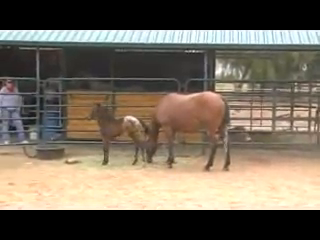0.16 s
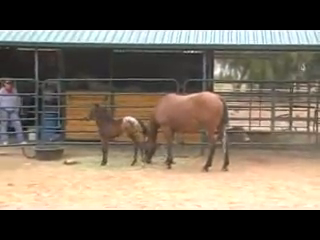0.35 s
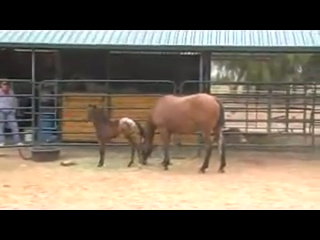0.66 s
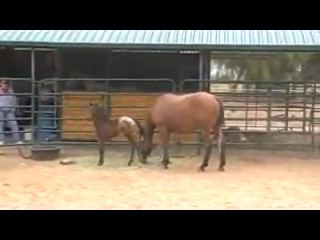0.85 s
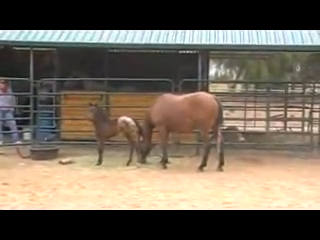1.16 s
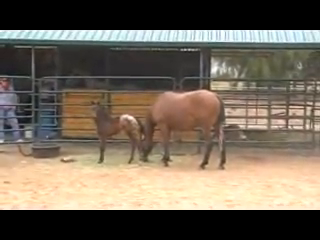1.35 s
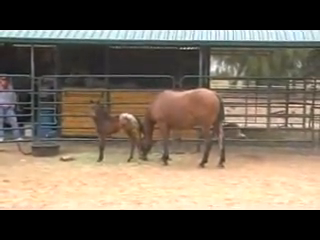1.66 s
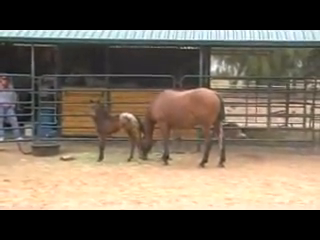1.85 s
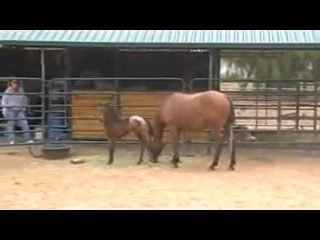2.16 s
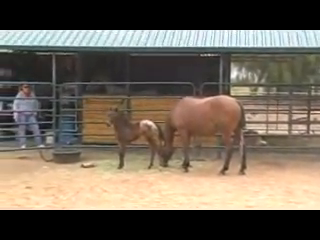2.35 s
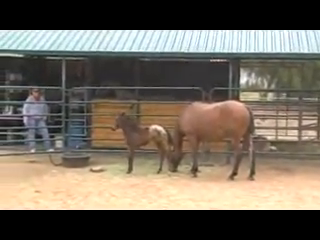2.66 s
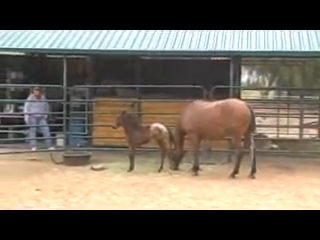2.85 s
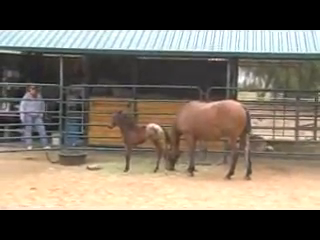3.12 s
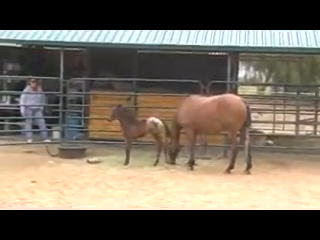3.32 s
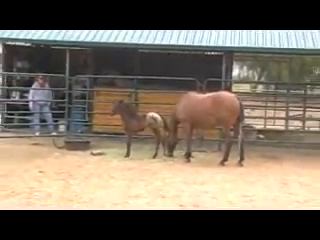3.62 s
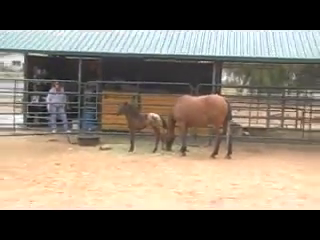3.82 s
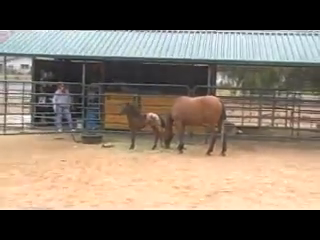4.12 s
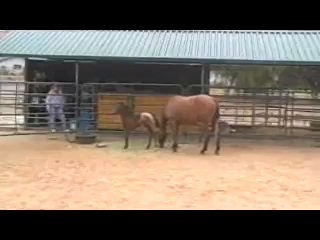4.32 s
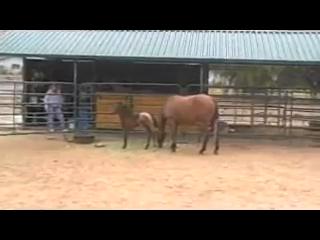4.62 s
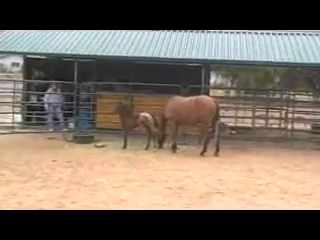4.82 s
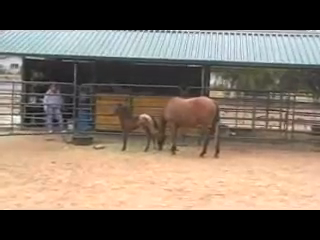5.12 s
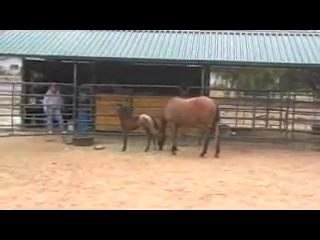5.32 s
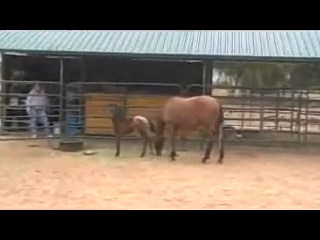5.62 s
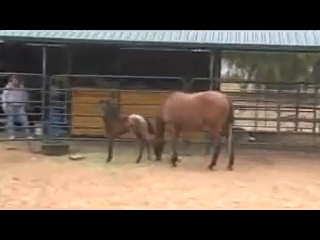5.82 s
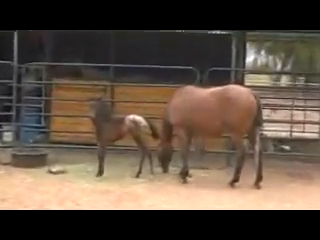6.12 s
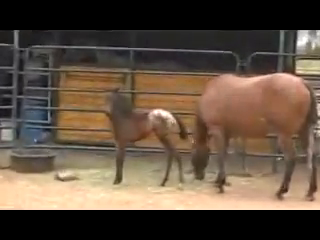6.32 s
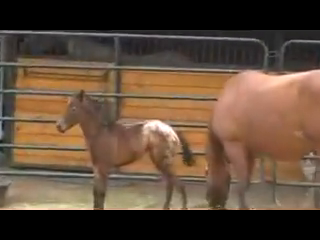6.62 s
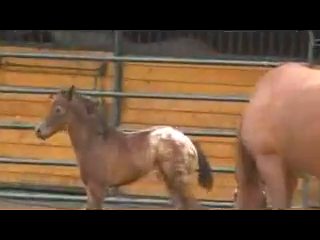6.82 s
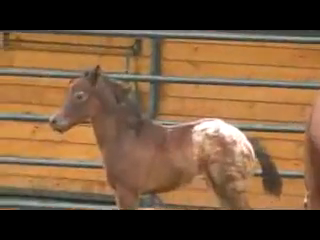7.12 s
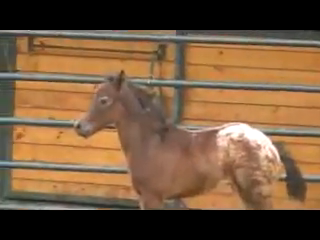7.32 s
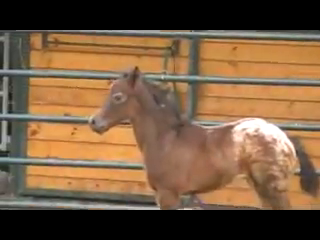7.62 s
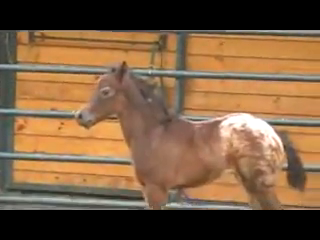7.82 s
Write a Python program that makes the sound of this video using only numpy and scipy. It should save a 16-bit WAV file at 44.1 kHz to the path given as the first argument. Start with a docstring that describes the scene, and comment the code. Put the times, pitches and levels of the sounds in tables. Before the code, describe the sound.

Sparrows chirp for the whole eight seconds under an open shed roof, their short, high, raspy calls trailed by a light echo. One nearer bird, slightly to the right, gives a clear chirrup at about 1, 2.5, 4.3, 6.1 and 7.4 seconds, while others cheep more softly between. A horse's hooves knock dully on boards and scuff loose earth through the first 1.7 seconds, again around 4 to 4.4 and 5.4, and lightly near 6 and 7. Fingers make dry, sharp clicks on a plastic casing right beside the microphone, light from about 2 seconds, firmer at 3.5, then in loud clusters from 4.3 to 5.3 and at 7 seconds. These clicks stand out above the birds. Behind everything a faint, distant low hum holds steady, while a soft rustle and hiss swell and fade together.

```python
"""Sparrows in a paddock shed

Sparrows chirp under the roof of an open shed, their raspy whistles smeared by its echo.
Hooves knock on boards and loose earth; fingers click on a plastic casing next to the microphone.
Behind them lies a far hum, and a faint rustle and hiss swell and fade together."""
import sys
import numpy as np
from scipy import signal
from scipy.io import wavfile

SR = 44100
rng = np.random.default_rng(int(sys.argv[2]) if len(sys.argv) > 2 else 0)


def unload_wav(signal):
    """Save mono or channel-first audio to the path in sys.argv[1] as 16-bit WAV at rate SR, clipped to [-1, 1]."""
    wavfile.write(
        sys.argv[1],
        SR,
        np.round(np.clip(np.atleast_2d(signal).T, -1, 1) * 32767).astype(np.int16),
    )


N = 351477


def whistle(out, start_s, shape, call_db, pitch, rasp_db):
    """Add one call: a near sine with a faint octave and air hissing past the beak. Flutter gives rasp."""
    knots_s, hz, shape_db = np.transpose(shape)
    t = np.arange(int(knots_s[-1] * SR)) / SR
    jitter = rng.uniform(-1.7, 1.7, (2, 100))
    pitch_flutter, level_flutter = [np.interp(t, np.arange(100) * .0016, v) for v in jitter]
    glide_hz = pitch * np.interp(t, knots_s, hz) * (1 + .004 * rasp_db * pitch_flutter)
    phase = 2 * np.pi * np.cumsum(glide_hz) / SR
    fade = np.clip(np.minimum(t, t[-1] - t) / .004, 0, 1)
    level = from_db(call_db + np.interp(t, knots_s, shape_db) + rasp_db * level_flutter) * fade
    breath = filtered(rng.standard_normal(len(t)), (3000, 8500), "band")
    voice = np.sin(phase) + from_db(-29) * np.sin(2 * phase) + from_db(-17) * breath
    i = int(start_s * SR)
    out[i:i + len(t)] += (level * voice)[:N - i]


# Contours of a chirrup's layers: t/s, f/Hz, level/dB
SCRATCHY_RISE = [(0, 4150, -14), (.018, 4750, -5), (.028, 6900, -12)]
CLEAR_BODY = [(0, 2700, -16), (.006, 3750, -11), (.013, 4230, -7), (.027, 4180, -6), (.034, 3250, -9),
              (.046, 4100, -13), (.052, 3300, -18), (.056, 2900, -7), (.066, 2970, -2), (.078, 3250, -4),
              (.085, 3750, -10), (.09, 3100, -20), (.096, 2900, 0.5), (.102, 2800, -4), (.108, 2250, -20)]
SCRATCHY_MIDDLE = [(0, 3600, -6), (.012, 4400, 0), (.03, 3900, -3), (.05, 4300, -10)]
HOARSE_TAIL = [(0, 2700, -3), (.008, 2100, -4), (.022, 3400, -4), (.045, 2800, -5), (.08, 3300, -13)]
# Chirrup cues: t/s, level/dB
CHIRRUP_CUES = [(.980, -26.5), (2.516, -26), (4.289, -26.5), (6.133, -25.5), (7.358, -24)]


def near_sparrow():
    """The lead bird holds its pitch: a scratchy pickup, a clear chirrup, a hoarse dying warble."""
    out = np.zeros(N)
    for s, db in CHIRRUP_CUES:
        pitch = rng.normal(1, .006)
        whistle(out, s - .019, SCRATCHY_RISE, db - 19, pitch, rasp_db=8)
        whistle(out, s - .019, SCRATCHY_RISE, db - 24, pitch / 2, rasp_db=8)   # sub-octave
        whistle(out, s + .104, HOARSE_TAIL, db - 17, pitch, rasp_db=11)
        whistle(out, s + .034, SCRATCHY_MIDDLE, db - 17, pitch, rasp_db=11)
        whistle(out, s, CLEAR_BODY, db, pitch, rasp_db=3.6)
    return out


# Call contours: t/s, f/Hz, level/dB
CHEEP_SHAPE = [(0, 3590, -16), (.008, 4090, -4), (.018, 4400, -2), (.026, 4700, 0), (.032, 3800, -5),
               (.045, 3450, -7), (.065, 3150, -9), (.095, 2750, -15)]
SLUR_SHAPE = [(0, 4200, -12), (.008, 4400, -4), (.022, 4250, -1), (.042, 3600, 0), (.055, 3100, -5),
              (.075, 2800, -10)]
FLICK_SHAPE = [(0, 3100, -14), (.015, 3900, -8), (.023, 4600, 0), (.035, 5500, -7), (.046, 4300, -1),
               (.064, 3000, -2), (.078, 4100, -6), (.086, 4200, -14)]
SCOLD_SHAPE = [(0, 4700, 0), (.012, 4750, 0), (.03, 4500, -3), (.05, 4300, -12)]
# Cues of the steady cheeper: t/s, level/dB
CHEEP_CUES = [(0.167, -37), (1.345, -38), (2.152, -36), (3.052, -39.5), (4.141, -37.5), (5.091, -35.5),
              (5.817, -35.5), (6.474, -38.5), (7.058, -41.5)]
# Cues of the other callers: t/s, level/dB, pitch/ratio
SLUR_CUES = [(0.117, -47, 1.05), (1.255, -46.5, 1.13), (1.955, -45, 1.04), (3.336, -48, 1.11),
             (4.631, -44, 1), (5.328, -45.5, 1.07), (6.537, -42, 0.98)]
FLICK_CUES = [(0.694, -48, 1), (7.674, -43.5, 1)]
SCOLD_CUES = [(2.688, -49, 1), (4.79, -53, 1), (5.93, -56, .95)]
# Short gliding peeps: t/s, start f/Hz, end f/Hz, level/dB
PEEP_CUES = [(0.262, 4670, 4530, -50), (1.28, 2586, 3320, -48), (1.589, 4190, 3500, -55.5),
             (1.625, 2880, 3330, -62), (3.29, 3980, 3600, -54), (4.021, 4530, 3500, -45.5),
             (2.397, 3880, 3500, -54.5), (2.715, 2900, 3150, -47.5), (2.751, 3360, 3750, -46),
             (2.77, 3100, 2780, -53), (3.603, 2990, 3370, -61), (4.83, 3150, 2910, -47.5),
             (4.865, 3550, 3250, -46), (4.867, 3950, 4050, -47), (4.91, 3000, 3620, -50),
             (5.393, 3400, 3230, -54), (7.157, 4590, 4480, -54), (7.765, 3100, 3200, -63),
             (7.91, 5080, 4470, -46)]


def far_sparrows():
    """Birds deeper under the roof whistle cheeps, slurs, flicks, two-voiced scolds and peeps."""
    out = np.zeros(N)
    for s, db in CHEEP_CUES:
        whistle(out, s, CHEEP_SHAPE, db, pitch=rng.normal(1, .006), rasp_db=4.3)
    for s, db, pitch in SLUR_CUES:
        whistle(out, s, SLUR_SHAPE, db, pitch, rasp_db=5)
    for s, db, pitch in FLICK_CUES:
        whistle(out, s, FLICK_SHAPE, db, pitch, rasp_db=4.5)
    for s, db, pitch in SCOLD_CUES:
        whistle(out, s, SCOLD_SHAPE, db, pitch, rasp_db=8)
        whistle(out, s, SCOLD_SHAPE, db - 2, pitch * 1.14, rasp_db=8)
    for s, start_hz, end_hz, db in PEEP_CUES:
        glide = [(0, start_hz, -6), (.02, (start_hz + end_hz) / 2, 0), (.04, end_hz, -6)]
        whistle(out, s, glide, db, pitch=1, rasp_db=5)
    return out


# Finger clicks: t/s, level/dB, hardness/(dB per octave)
CLICK_CUES = [(1.93, -42.5, 1.5), (2.835, -39, -6), (2.96, -42, 3.5), (2.987, -41.5, 2), (3.432, -36, -1.5),
              (3.465, -37.5, 1), (3.501, -36, -3), (3.529, -29.5, -14), (3.958, -47, -7), (3.985, -32, -1),
              (3.989, -30, -2.5), (4.27, -39.5, 10), (4.293, -18, 0), (4.365, -23.5, 3.5),
              (4.415, -25.5, 2), (4.687, -41, 2), (4.731, -37.5, -2), (4.966, -36.5, -3), (4.99, -20.5, 9),
              (5.002, -25.5, -14), (5.261, -21, -0.5), (5.286, -20.5, 0.5), (5.302, -35, 2),
              (5.326, -19.5, -3.5), (5.669, -28, -4.5), (6.011, -42, -1), (6.589, -38, 0),
              (6.966, -35.5, -7), (7.003, -18, -2.5), (7.052, -25, 0), (7.075, -27.5, 4),
              (7.082, -15.5, 3.5)]
# Thin ticks of the button alone: t/s, level/dB
TICK_CUES = [(2.054, -48), (2.987, -40.5), (3.003, -48), (3.803, -43), (4.5, -42.5), (4.785, -47.5),
             (5.734, -46), (5.812, -45.5), (5.919, -48), (6.221, -48), (6.683, -51.5)]
# Resonances of the plastic shell and its button: f/Hz, level/dB, T60/s
SHELL_MODES = [(742, 3, 0.0065), (1340, 0.5, 0.01), (1584, -5, 0.013), (1974, -8, 0.014),
               (2233, -4.5, 0.037), (2530, -18.5, 0.022)]
BUTTON_MODES = [(3060, -6, 0.007), (3650, -9, 0.006), (4480, -9, 0.008), (4920, -5, 0.008),
                (6020, -1, 0.005), (7050, -5, 0.006), (8140, 3, 0.0023)]


def finger_clicks():
    """Fingers ring the shell and snap its button, with one quick bounce and a burst of grit."""
    s, db, hardness = np.transpose(CLICK_CUES)
    tick_s, tick_db = np.transpose(TICK_CUES)
    shell = strike(s, db, hardness, SHELL_MODES, spread_db=2.5)
    shell = filtered(shell, 480, "high")   # a small shell radiates no bass
    snap_db = db - 13 + 1.3 * hardness + .44 * (db + 30)   # harder, firmer clicks have more snap
    tilt = np.r_[np.zeros(len(s)), np.full(len(tick_s), 5)]
    button = strike(np.r_[s, tick_s], np.r_[snap_db, tick_db], tilt, BUTTON_MODES, spread_db=4)
    # The shell leans right on firm clicks; the button stays centred.
    latest_click = np.clip(np.searchsorted(s, np.arange(N) / SR) - 1, 0, None)
    lean_db = .15 * np.clip(db + 38, 0, None)[latest_click]
    left = from_db(-lean_db) * shell + button
    right = delay(from_db(lean_db) * shell, .00012) + button
    bounced = np.array([side + from_db(-4) * delay(side, .0011) for side in (left, right)])
    return bounced + grit(s, snap_db - 12, t60=.035, band_hz=(2300, 9000))


# Hoof falls: t/s, level/dB, hardness/(dB per octave)
HOOF_CUES = [(0.166, -36.5, 3.5), (0.204, -44.5, 7.5), (0.354, -47.5, 7.5), (0.43, -44, 8.5),
             (0.486, -37, 3), (0.759, -40, 3), (0.812, -28, -3.5), (0.848, -44, 0.5), (0.913, -43, 0.5),
             (1.112, -31.5, -4), (1.655, -27, -30), (2.712, -56, 9), (3.914, -31.5, -13.5),
             (4.32, -22.5, -16), (4.398, -25, -21), (5.379, -28, -10.5), (5.409, -28.5, -12.5),
             (5.949, -36, -4), (7.023, -33.5, 4), (7.06, -43, -1)]
# Resonances of the boards: f/Hz, level/dB, T60/s
BOARD_MODES = [(147.7, -12.5, 0.078), (237, -4.5, 0.1), (338, -7.5, 0.11), (424, -8, 0.049),
               (566, -0.5, 0.015), (730, -13.5, 0.039), (966, -12, 0.016)]


def hooves(scuff_s=.03):
    """A padded blow and five weaker, uneven contacts; loose earth shifts, more under a hard hoof."""
    s, db, hardness = np.transpose(HOOF_CUES)
    lag = np.c_[np.zeros(len(s)), rng.random((len(s), 5))]
    contact_s = (s[:, None] + scuff_s * lag).ravel()
    contact_db = (db[:, None] - 9 * lag - 3 * (lag > 0)).ravel()
    boards = strike(contact_s, contact_db, np.repeat(hardness, 6), BOARD_MODES, spread_db=2.5)
    earth = grit(s, db - 7.5 + 1.4 * hardness, t60=.21, band_hz=(350, 2400))
    return filtered(boards, (80, 1000), "band"), earth


def strike(times, blow_db, hardness, modes, spread_db):
    """Every blow rings all modes; a harder blow favours the high ones."""
    onsets, out = (times * SR).astype(int), np.zeros(N)
    scatter_db = spread_db * rng.standard_normal((len(onsets), len(modes)))
    for k, (hz, mode_db, t60) in enumerate(modes):
        tilt_db = hardness * np.log2(hz / modes[0][0])
        blows = np.full(N, 1e-18)
        blows[onsets] = from_db(blow_db + mode_db + tilt_db + scatter_db[:, k])
        r, w = from_db(-60 / (t60 * SR)), 2 * np.pi * hz / SR
        out += (-1) ** k * signal.lfilter([0, np.sin(w)], [1, -2 * r * np.cos(w), r * r], blows)
    return out


def grit(times, blow_db, t60, band_hz):
    """A wide, dying burst of noise at each blow."""
    blows = np.full(N, 1e-18)
    blows[(times * SR).astype(int)] = from_db(blow_db)
    envelope = signal.lfilter([1], [1, -from_db(-60 / (t60 * SR))], blows)
    noise = stereo(*rng.standard_normal((2, N)), correlation=.35)
    return filtered(envelope * noise, band_hz, "band")


def flock(calls_per_s=25):
    """The rest of the flock chatters at random, far off."""
    out = np.zeros(N)
    for when, kind, distance, tuning in rng.random((200, 4))[:int(calls_per_s * N / SR)]:
        shape = CHEEP_SHAPE if kind < .5 else SLUR_SHAPE
        whistle(out, when * N / SR, shape, -60.5 - 5 * distance, pitch=.88 + .17 * tuning, rasp_db=5)
    return out


def shed(x, low_t60=.5, treble_t60=.4, crossover_hz=3600):
    """Roof, rails and boards scatter the sound into a dense reverb whose treble dies sooner."""
    t = np.arange(SR // 2) / SR
    white = rng.standard_normal((2, 2, len(t)))
    low_decay = from_db(-60 * t / low_t60)
    dull = filtered(white, crossover_hz, "low") * low_decay
    bright = filtered(white, crossover_hz, "high") * from_db(-1.5 - 60 * t / treble_t60)
    mid, side = (dull - bright) * np.clip(t / .0074, 0, 1)
    tails = np.array([mid + .28 * side, mid - .28 * side]) / np.sqrt(np.sum(low_decay ** 2))
    wet = signal.fftconvolve(x[None, None], tails, axes=2)[:, :, :N]
    # Moving air shifts the echo paths: the sound shimmers between two stereo tails.
    angle = 1.3 * drift(60)
    return np.cos(angle) * wet[:, 0] + np.sin(angle) * wet[:, 1]


# Level of the background hiss over time: t/s, level/dB
HISS_LEVEL = [(0.0, -60.5), (0.35, -54.5), (1.28, -61.5), (1.75, -66.5), (2.53, -61.5), (2.66, -60),
              (2.93, -57.5), (3.55, -65.5), (4.06, -58.5), (4.22, -65.5), (4.3, -60.5), (5.24, -61.5),
              (5.46, -63.5), (5.68, -61), (5.88, -58), (6.5, -57), (6.79, -56.5), (7.97, -60.5)]
# Tone curves of the background beds: f/Hz, relative density/dB
HUM_CURVE = [(12, -53), (20, -41), (68, -8), (157, -1), (321, -7), (386, -10.5), (600, -7.5), (780, -67),
             (1320, -120)]
RUSTLE_CURVE = [(180, -43), (300, -3.5), (389, -6), (1060, -3), (1750, -11.5), (1910, -14), (2550, -11.5),
                (3000, 2), (3900, -30), (6600, -120)]
HISS_CURVE = [(1200, -42), (2000, -32), (3500, -5.5), (5300, 1), (7000, -1.5), (8800, -3.5), (12000, -24.5),
              (16000, -36.5)]


def ambience():
    """A far hum holds its level while faint rustle and hiss swell and fade together."""
    hiss_db = np.interp(np.arange(N) / SR, *np.transpose(HISS_LEVEL))
    rustle_db = -52 + .63 * (hiss_db - hiss_db.mean())
    hum = from_db(-52.5) * noise_bed(HUM_CURVE, flicker_db=2.3)
    rustle = from_db(rustle_db) * noise_bed(RUSTLE_CURVE, flicker_db=2.4)
    hiss = from_db(hiss_db) * noise_bed(HISS_CURVE, flicker_db=1.2)
    return hum + rustle + hiss


# Stereo image of the beds, wide lows and centred highs: f/Hz, left-right correlation/ratio
BED_IMAGE = [(60, 0.11), (180, 0.068), (550, 0.024), (1650, 0.47), (4000, 1), (8000, 1), (15000, .93)]


def noise_bed(curve, flicker_db):
    """Half-octave bands of noise, each with its own level, flicker and width; unit rms overall."""
    out, shared_flicker = 0, drift(13.5)
    edges_hz = 22 * 2 ** np.arange(0, 10, .5)
    white = rng.standard_normal((2, 2, N))
    for k, (low, high) in enumerate(zip(edges_hz, edges_hz[1:])):
        hz = np.sqrt(low * high)
        band_db = at_hz(curve, hz)
        if band_db < -45:   # too faint to hear
            continue
        mid, side = filtered(white[k % 2], (low, high), "band")
        gain = from_db(band_db + flicker_db * (.7 * shared_flicker + drift(22)))
        out = out + gain * stereo(mid, side, at_hz(BED_IMAGE, hz))
    return unit_rms(out)


def drift(rate_hz):
    """Smooth random modulation of unit rms, rolling off above rate_hz."""
    step = 40
    r = np.exp(-2 * np.pi * rate_hz * step / SR)
    slow = signal.lfilter([1], [1, -2 * r, r * r], rng.standard_normal(N // step + 2002))[2000:]
    return np.interp(np.arange(N) / step, np.arange(len(slow)), unit_rms(slow))


def from_db(db):
    """Decibels to gain."""
    return 10 ** (np.asarray(db) / 20)


def unit_rms(x):
    """Scale to unit rms."""
    return x / np.sqrt(np.mean(x ** 2) + 1e-20)


def at_hz(curve, hz):
    """Read a curve on a log-frequency axis."""
    knots_hz, values = np.transpose(curve)
    return np.interp(np.log(hz), np.log(knots_hz), values)


def filtered(x, hz, kind, order=2):
    """Flat low-, high- or band-pass filter."""
    return signal.sosfilt(signal.butter(order, hz, kind, fs=SR, output="sos"), x)


def stereo(mid, side, correlation):
    """Blend two noises into left and right."""
    return np.sqrt(1 + correlation) * mid + np.sqrt(1 - correlation) * side * [[1], [-1]]


def delay(x, seconds):
    """Delay with sub-sample precision."""
    return np.interp(np.arange(N) - seconds * SR, np.arange(N), x)


def pan_right(db):
    """Channel gains that favour the right by db."""
    return from_db([[-db / 2], [db / 2]])


def scene():
    """Birds and hooves feed the shed, the flock is all reverb, clicks and ambience stay dry."""
    near, far = near_sparrow(), far_sparrows()
    knocks, earth = hooves()
    send = from_db(-9) * near + from_db(-2.5) * far + from_db(-3) * knocks + flock()
    reverb = shed(send)
    birds = (near + from_db(-2) * far) * pan_right(3)
    steps = knocks * pan_right(1.2) + earth
    return birds + steps + reverb + finger_clicks() + ambience() * pan_right(.5)


def record(dry):
    """Add faint hiss and cut deep bass; filter off treble above 9 kHz, keeping a faint 11-15 kHz band."""
    steady_hiss = from_db(-65.5) * rng.standard_normal(N)
    mix = filtered(dry + steady_hiss, 45, "high", order=3)
    body = signal.sosfilt(signal.ellip(10, .5, 52, 8850, fs=SR, output="sos"), mix)
    sheen = signal.sosfilt(signal.ellip(4, 1, 30, (11200, 15200), "band", fs=SR, output="sos"), mix)
    top_cut = signal.cheby2(12, 70, 15700, fs=SR, output="sos")
    return signal.sosfilt(top_cut, body + from_db(-13.5) * sheen)


dry = scene()
out = record(dry)
unload_wav(out)
```